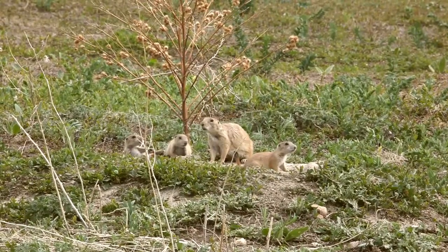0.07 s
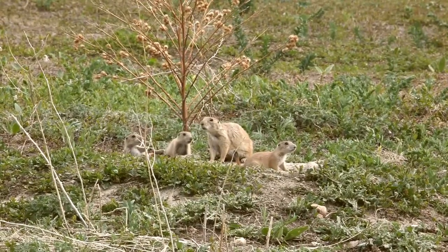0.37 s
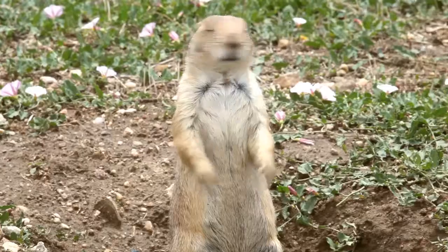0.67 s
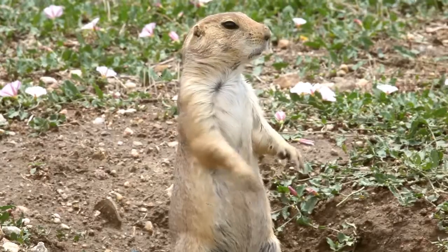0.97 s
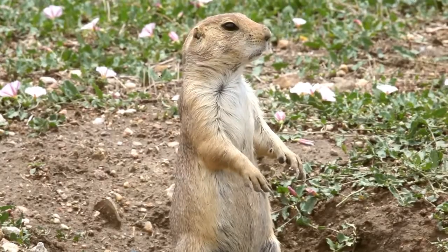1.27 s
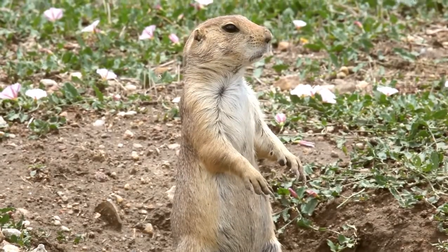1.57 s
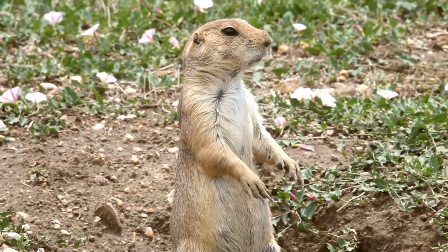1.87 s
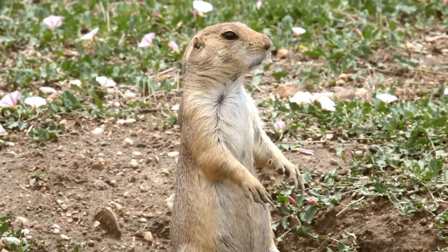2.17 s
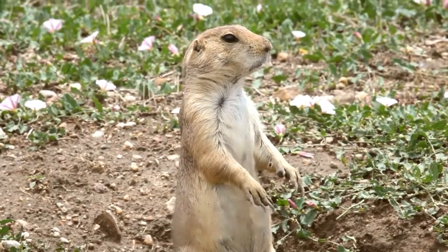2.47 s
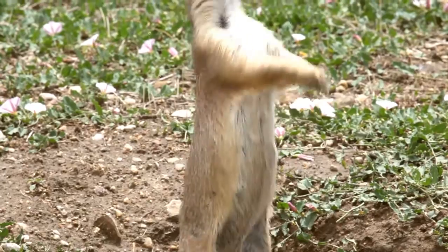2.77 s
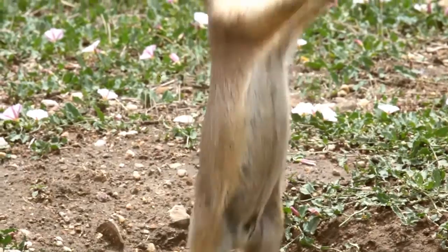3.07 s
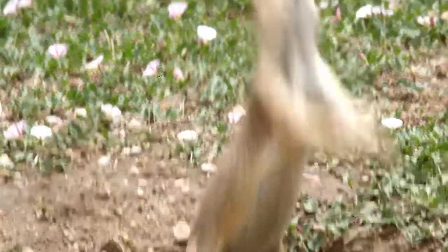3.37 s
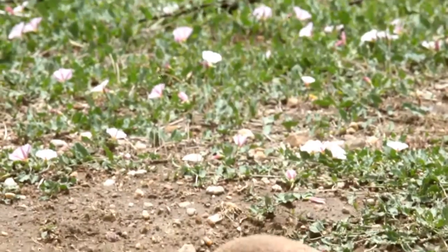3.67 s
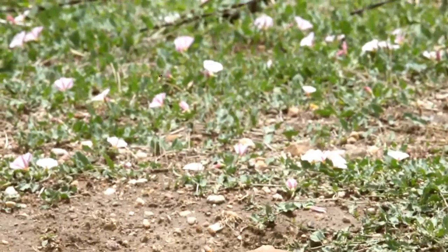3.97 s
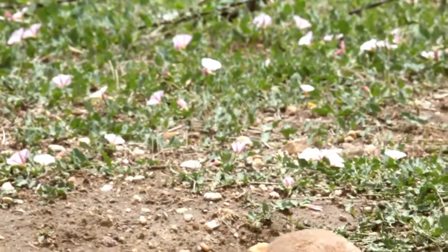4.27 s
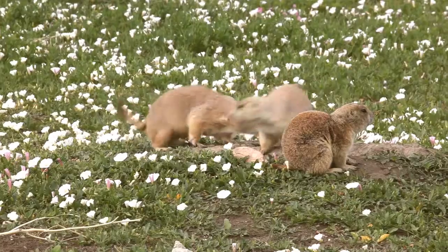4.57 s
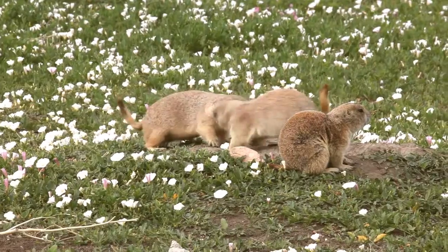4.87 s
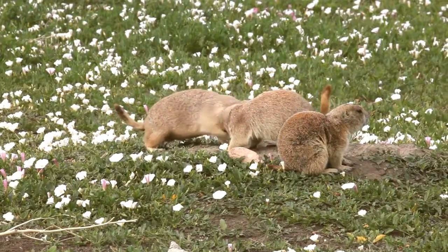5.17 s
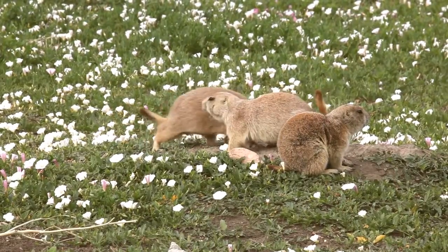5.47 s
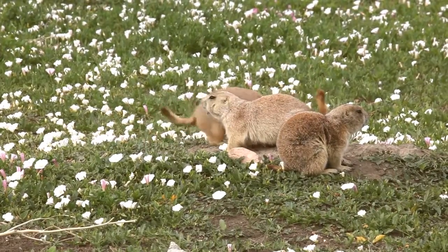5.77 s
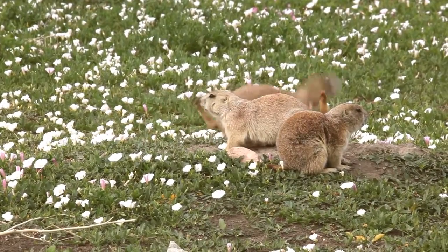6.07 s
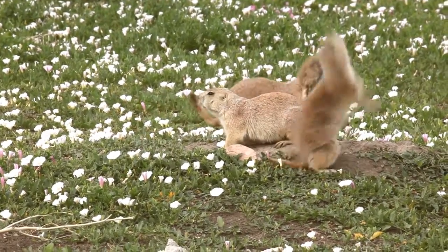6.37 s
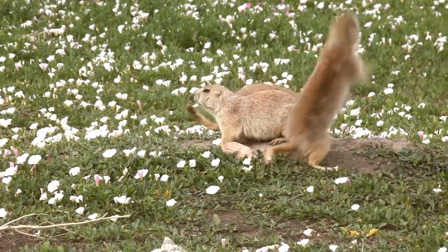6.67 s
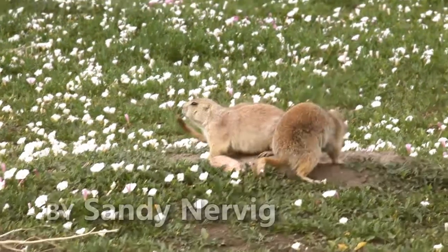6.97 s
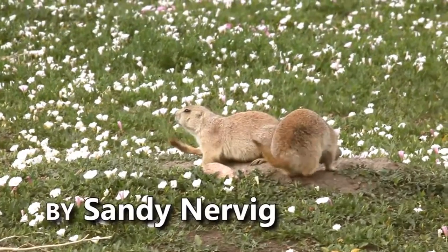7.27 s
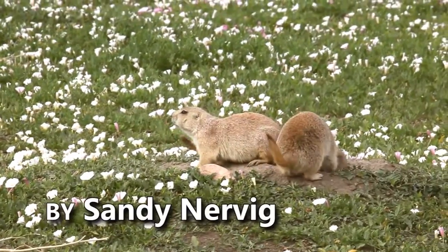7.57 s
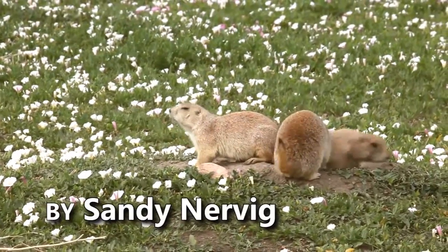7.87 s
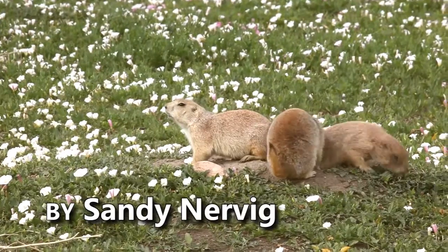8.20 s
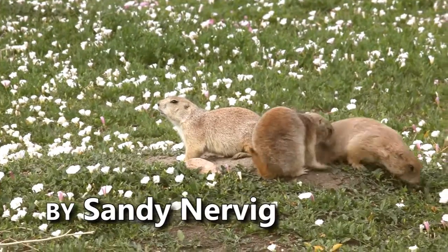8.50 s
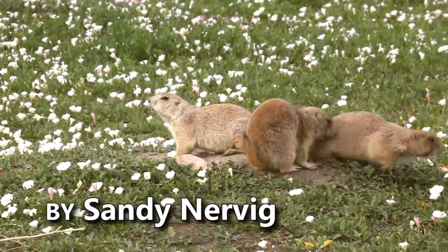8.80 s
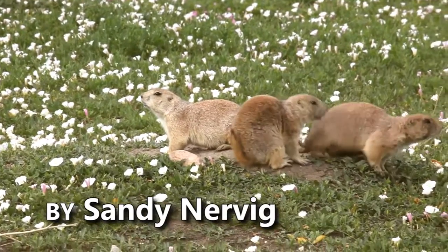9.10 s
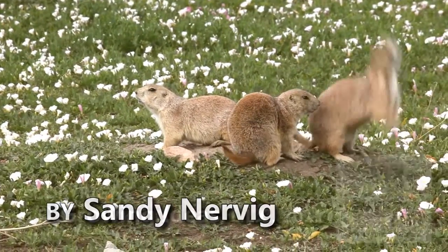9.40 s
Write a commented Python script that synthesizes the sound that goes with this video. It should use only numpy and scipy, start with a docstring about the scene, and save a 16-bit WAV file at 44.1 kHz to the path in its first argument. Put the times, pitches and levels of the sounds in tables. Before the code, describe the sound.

Separate bursts of sharp prairie dog yips and gliding squeals in quiet grassland, with faint insect ticks and a light breeze.

```python
"""A grassland prairie dog colony, heard from three spots in turn; the middle one is close to the animals.
Each yip is a high gliding voice from the vocal folds that breaks into a rasp, shaped by throat and mouth.
Soft squeaks fall between the yips, small birds chirp far off and insects tick in the grass.
A far engine drones and grass rustles at the close spot; at the other two, light wind bumps the microphone."""
import sys
import numpy as np
from scipy import signal
from scipy.fft import rfft, irfft, next_fast_len
from scipy.io import wavfile
from scipy.ndimage import uniform_filter1d, minimum_filter1d

SR = 44100
rng = np.random.default_rng(int(sys.argv[2]) if len(sys.argv) > 2 else 0)


def wav_record(signal):
    """Record a signal, one row per channel, as 16-bit PCM in the file named by sys.argv[1]."""
    frames = np.transpose(np.atleast_2d(signal))
    bounded = np.clip(frames, -1, 1)
    # unit amplitude maps onto the largest positive 16-bit level
    quanta = np.round(bounded * 32767).astype(np.int16)
    wavfile.write(sys.argv[1], SR, quanta)


N = 420713
CLOSE_START_S, CLOSE_END_S = .68, 4.487   # time spent at the close spot
CUTOFF_HZ = 11900   # top of the treble
# throat shapes for the soft squeaks: (frequency [Hz], gain [dB])
SQUEAK_THROAT = [(600, -35), (1800, -5), (3000, 0.5), (3800, -1), (5800, -6.5), (8500, -18), (12000, -39)]
WHINE_THROAT = [(600, -22), (1800, -11.5), (3000, -4), (3800, -1.5), (5800, 3.5), (8500, -18), (12000, -47)]
PEEP_THROAT = [(600, -30), (1800, -15), (3000, 1), (3800, 4), (5800, -6.5), (8500, -16), (12000, -63)]
SOFT_THROAT = [(600, -6), (1800, 2), (3000, 9.5), (3800, -9), (5800, -10), (8500, -42), (12000, -39)]


def prairie_dogs():
    """Nine calls, each with its own tune and rasp; the two "oo" calls share a throat shape."""
    # the path of each call: (time [s], pitch [Hz], level [dB])
    raspy_yip = [(0.786, 1687, -32), (0.802, 2032, -19), (0.832, 2262, -16), (0.898, 2115, -18),
                 (0.93, 1940, -20), (1.004, 1784, -30), (1.04, 1518, -35.5), (1.054, 1410, -45.5)]
    sharp_yip = [(1.878, 1763, -22), (1.888, 2076, -6), (1.904, 2150, -8.5), (1.922, 2010, -6),
                 (1.93, 1896, -9.5), (1.976, 1879, -10.5), (1.984, 1770, -19.5), (2.0, 1280, -31.5)]
    close_whee = [(2.922, 1339, -8), (2.944, 1791, -7.5), (2.982, 2063, -10), (3.004, 2399, -8.5),
                  (3.03, 2624, -8.5), (3.05, 2542, -9.5), (3.06, 2046, -16.5), (3.09, 1810, -19.5),
                  (3.132, 1719, -21.5), (3.252, 1307, -26.5), (3.275, 1263, -33)]
    close_oo = [(3.298, 1179, -41), (3.32, 1124, -30), (3.356, 1178, -30), (3.376, 1422, -29.5),
                (3.432, 1236, -27), (3.47, 1120, -36), (3.49, 995.2, -37)]
    low_oo = [(3.492, 972, -34), (3.518, 869, -32), (3.624, 670, -46.5), (3.66, 590, -57)]
    arched_yip = [(5.988, 1003, -33), (6.046, 1225, -26.5), (6.102, 1179, -23.5), (6.122, 929.6, -37),
                  (6.148, 783, -38), (6.168, 740, -42), (6.26, 722.5, -50)]
    clear_whee = [(6.287, 1055, -34), (6.297, 1030, -25), (6.325, 1120, -18), (6.367, 1016, -24.5),
                  (6.439, 1024, -26), (6.473, 1194, -19.5), (6.505, 1244, -18.5), (6.531, 1214, -19),
                  (6.549, 924, -37.5), (6.555, 915, -33)]
    rising_yip = [(9.047, 1065, -37), (9.067, 1116, -25.5), (9.175, 1276, -23.5), (9.231, 1296, -21.5),
                  (9.247, 1120, -27.5), (9.255, 1080, -37)]
    last_whee = [(9.338, 779, -34), (9.37, 989.9, -21.5), (9.402, 1112, -23.5), (9.438, 1160, -17),
                 (9.458, 1113, -18), (9.476, 1150, -15.5), (9.494, 1089, -18.5), (9.54, 1177, -12.5)]
    # how throat and mouth boost or weaken each frequency: (frequency [Hz], gain [dB])
    raspy_throat = [(600, -36), (1200, -29), (1800, -33), (2400, -8), (3000, -3.5), (3800, 1), (4700, -6),
                    (5800, 0), (7000, -9), (8500, -21), (10000, -25), (12000, -59)]
    sharp_throat = [(600, -63.5), (1200, -39), (1800, -36), (2400, -19), (3000, -25.5), (3800, -19.5),
                    (4700, -23.5), (5800, 4), (7000, -10.5), (8500, -9), (10000, -29), (12000, -24)]
    whee_throat = [(600, -105), (1200, -11), (1800, -7.5), (2400, 4.5), (3000, 9), (3800, -2.5), (4700, 1),
                   (5800, 2.5), (7000, -17), (8500, -10.5), (10000, -35), (12000, -25)]
    oo_throat = [(600, -17), (800, -3), (1000, -20), (1250, 0.5), (1800, -5.5), (2500, 8), (3000, 5),
                 (3800, -8.5), (4700, -2), (5800, -4), (7000, -18), (12000, -33)]
    arched_throat = [(600, -12.5), (1200, -24.5), (1800, -8.5), (2400, -1), (3000, -0.5), (3800, 0),
                     (4700, -2), (5800, -9), (7000, -20), (8500, -11.5), (10000, -22), (12000, -29)]
    clear_throat = [(600, -32), (1200, -24), (1800, -23), (2400, 3.5), (3000, 3), (3800, -2), (4700, -2.5),
                    (5800, 7), (7000, -8), (8500, -12), (10000, -29), (12000, -39)]
    rising_throat = [(600, -59), (1200, -23.5), (1800, -19), (2400, -17), (3000, -10.5), (3800, -1),
                     (4700, -8), (5800, -6), (7000, 0), (8500, -12), (10000, -26), (12000, -46)]
    last_throat = [(600, -44), (1200, -31.5), (1850, -34), (2300, 0), (2700, -5.5), (3100, -12),
                   (3700, -8.5), (4500, -17.5), (5400, -19.5), (7000, -37), (8500, -36.5), (12000, -53)]
    raspy = call_shape(raspy_yip, calm=0.54, rasp=0.93, rasp_at_s=0.065, build_s=.03, clear_s=0.035,
                       mouth_db=3, onset_db=7, closing_s=.08, opening=1.05)
    sharp = call_shape(sharp_yip, calm=0.35, rasp=0.67, rasp_at_s=0.04, build_s=.025, clear_s=0.033,
                       mouth_db=-16.5, onset_db=15.5, closing_s=0.05, opening=1.0)
    whee = call_shape(close_whee, calm=.1, rasp=0.9, rasp_at_s=0.065, build_s=0.049, clear_s=0.28,
                      mouth_db=7, onset_db=-10.5, closing_s=0.015, opening=0.57, attack_db=6)
    oo = call_shape(close_oo, calm=.6, rasp=1.0, rasp_at_s=0.049, build_s=0.036, clear_s=0.046,
                    mouth_db=1)
    low = call_shape(low_oo, calm=0.28, rasp=0.61, rasp_at_s=0.027, build_s=.06, clear_s=0.045,
                     mouth_db=-0.5, onset_db=11, closing_s=0.033)
    arched = call_shape(arched_yip, calm=.3, rasp=.72, rasp_at_s=.105, build_s=.045, clear_s=.04,
                        mouth_db=-7.5, onset_db=5, closing_s=0.014, opening=-0.18)
    clear = call_shape(clear_whee, calm=.09, rasp=0.74, rasp_at_s=0.26, build_s=0.032, clear_s=.04,
                       mouth_db=3, onset_db=18.5, closing_s=0.054, opening=0.9, catch=0.75)
    rising = call_shape(rising_yip, calm=0.24, rasp=0.77, rasp_at_s=0.15, build_s=0.085, clear_s=0.041,
                        mouth_db=-9, onset_db=12, closing_s=0.097, opening=1.0)
    last = call_shape(last_whee, calm=0.45, rasp=0.93, rasp_at_s=0.1, build_s=0.038, clear_s=0.15,
                      mouth_db=0, onset_db=47, closing_s=.035)
    return (voice(raspy, raspy_throat, hiss=1.55, fray_hz=3900)
            + voice(sharp, sharp_throat, hiss=0.56, fray_hz=5500)
            + voice(whee, whee_throat, growl=0.087, hiss=0.83, fray_hz=3500)
            + voice(oo, oo_throat, growl=0.1, hiss=.48, fray_hz=3080)
            + voice(low, oo_throat, growl=.1, hiss=.45, fray_hz=3200, flutter_db=3.5)
            + voice(arched, arched_throat, hiss=0.35, fray_hz=3600)
            + voice(clear, clear_throat, hiss=.6, jitter=0.0025, fray_hz=5200)
            + voice(rising, rising_throat, growl=.072, hiss=0.94, fray_hz=3900)
            + voice(last, last_throat, growl=.42, hiss=1.0, fray_hz=4200, upper_hz=4880))


def call_shape(curve, calm, rasp, rasp_at_s, build_s, clear_s, mouth_db, onset_db=0, closing_s=0.043,
               opening=0, catch=0, catch_s=0.02, attack_db=0, attack_s=0.003):
    """Curves that steer one call: it turns raspy and clears, while the mouth changes its brightness."""
    t = np.arange(int(curve[0][0] * SR), min(int(curve[-1][0] * SR), N)) / SR
    age = t - t[0]
    pitch, level_db = in_time(curve, t)
    rough = calm + (rasp - calm) * hump(age, rasp_at_s, build_s, clear_s)
    rough += catch * np.exp(-age / catch_s)   # the folds settle after a rough start
    bright_db = mouth_db + onset_db * np.exp(-age / closing_s)
    bright_db += opening * (level_db - level_db.max())   # the mouth follows the effort
    return t, pitch, level_db - attack_db * np.exp(-age / attack_s), rough, bright_db


def voice(shape, throat, hiss, fray_hz, growl=0.018, jitter=0.0044, upper_hz=4500, flutter_db=0):
    """Vocal folds make harmonics (multiples of the pitch); roughness frays them, high ones first."""
    t, pitch, level_db, rough, bright_db = shape
    size = len(t)
    rough = np.clip(rough, 0, 1)
    pitch = uniform_filter1d(pitch, size=300) * (1 + (jitter + .012 * rough) * drift(219, size))
    phase = 2 * np.pi * np.cumsum(pitch) / SR
    folds = np.zeros(size)
    for k in range(1, 17):
        frayed = np.tanh((rough * k * pitch / fray_hz) ** 1.5)
        # uneven cycles smear each harmonic into a band of noise
        uneven = .6 * (drift(900, size) + 1j * drift(900, size))
        wobble = from_db((5 * rough + flutter_db) * drift(45, size))
        pure = np.exp(1j * (k * phase + rng.uniform(0, 2 * np.pi)))
        harmonic = (np.sqrt(1 - frayed ** 2) + frayed * uneven) * pure
        # strong and weak cycles take turns, adding tones between the harmonics
        between = growl * np.sin((k - .5) * phase) * (1 + drift(59, size) / 2)
        folds += (harmonic.real * wobble + between) * (k * pitch < CUTOFF_HZ)
    folds *= 2 * np.sqrt(pitch / SR)   # the same power per Hz as white noise
    breath = hiss * rough ** 2 * rng.standard_normal(size) * (1 + np.cos(phase) / 2)
    sound = coloured(folds + breath, throat)
    # the mouth opening sets how much treble gets out
    lower = signal.sosfiltfilt(signal.butter(4, upper_hz, fs=SR, output="sos"), sound)
    sound = lower + from_db(bright_db) * (sound - lower)
    sound /= np.sqrt(uniform_filter1d(sound ** 2, size=600) + 1e-18)   # even out the loudness
    out = np.zeros(N)
    add(out, t[0], sound * from_db(level_db) * gate(t, t[0], t[-1], 0.0015))
    return out


def squeaks(swell_db=9, bend=1.2):
    """Soft prairie dog notes, each swelling and fading as it glides through three pitches."""
    # squeaks: (time [s], rise [s], fall [s], start pitch [Hz], pitch at peak [Hz], end pitch [Hz],
    # level [dB], roughness [0-1], brightness [dB], throat shape)
    notes = [(1.185, .048, .012, 2410, 2950, 2850, -35.5, 0.67, -1, SQUEAK_THROAT),
             (1.239, 0.017, .07, 2910, 2920, 2540, -41.5, 0.7, 10, SQUEAK_THROAT),
             (1.995, 0.029, 0.07, 1953, 1934, 1900, -36.5, 0.4, 7, PEEP_THROAT),
             (2.059, 0.046, 0.015, 2500, 2810, 2800, -32, 0.53, 12, SQUEAK_THROAT),
             (2.117, 0.011, 0.027, 3370, 3340, 3240, -36, 0.5, -8, SQUEAK_THROAT),
             (2.154, 0.0336, 0.02, 2064, 2220, 2150, -30.5, 0.55, 4, WHINE_THROAT),
             (2.204, 0.009, 0.16, 1910, 1860, 1510, -42.5, 0.65, -9, WHINE_THROAT),
             (4.488, 0.023, 0.033, 1796, 2040, 1700, -35.5, .2, 6, PEEP_THROAT),
             (6.59, 0.073, 0.041, 797, 824, 890, -40, 0.7, 15, SOFT_THROAT),
             (6.69, 0.051, .11, 967, 1006, 780, -41, 0.7, 9, SOFT_THROAT),
             (6.85, 0.073, 0.18, 1110, 1076, 694, -49.5, 0.65, 16, SOFT_THROAT),
             (7.745, .024, 0.04, 1775, 1982, 1630, -33.5, 0.34, -1.5, PEEP_THROAT)]
    out = np.zeros(N)
    for s, rise_s, fall_s, start_hz, peak_hz, end_hz, db, rough, bright_db, throat in notes:
        age = np.arange(int((rise_s + fall_s) * SR)) / SR
        sag = np.interp(age, [0, rise_s, rise_s + fall_s], [1, 0, 1]) ** bend
        pitch = peak_hz + sag * (np.where(age < rise_s, start_hz, end_hz) - peak_hz)
        shape = s + age, pitch, db - swell_db * sag, rough, bright_db
        out += voice(shape, throat, hiss=0.91, fray_hz=4000, flutter_db=2)
    return out


def field_echo(x, echo_db=-32, fade_s=0.75):
    """Mounds and plants scatter a little of the sound back."""
    t = np.arange(int(.6 * SR)) / SR
    echoes = rng.standard_normal(len(t)) * from_db(-60 * t / fade_s) * (t > .012)
    return from_db(echo_db) * signal.fftconvolve(x, echoes / np.linalg.norm(echoes))[:N]


def birds(pip_s=0.017):
    """Far birds whistle single chirps, and short pips in threes."""
    # chirps: (time [s], length [s], start pitch [Hz], middle pitch [Hz], end pitch [Hz], level [dB])
    chirps = [(0.023, 0.056, 4400, 3500, 2850, -51), (0.24, 0.053, 4640, 4060, 4770, -51),
              (0.555, 0.074, 3740, 4130, 3700, -50), (0.589, 0.052, 4000, 3570, 3600, -46.5),
              (7.043, 0.085, 4140, 4120, 4200, -42), (7.126, 0.22, 4300, 4030, 3900, -44.5),
              (7.277, 0.34, 3780, 3730, 3510, -49.5), (7.975, 0.038, 4900, 4800, 4880, -48)]
    # groups of pips: (time [s], spacing [s], pitch [Hz], level [dB])
    pips = [(.3, .034, 6100, -52), (.395, 0.039, 5030, -53), (.555, 0.032, 6070, -50.5),
            (5.14, .068, 5200, -54), (8.125, 0.047, 5200, -59), (8.515, 0.047, 5200, -55)]
    out = np.zeros(N)
    for s, length, start_hz, middle_hz, end_hz, db in chirps:
        add(out, s, from_db(db) * whistle(length, start_hz, middle_hz, end_hz))
    for s, spacing, hz, db in pips:
        for k in range(3):
            add(out, s + k * spacing, from_db(db) * whistle(pip_s, hz * 1.02, hz, hz * 1.03))
    return out


def whistle(length, start_hz, middle_hz, end_hz, waver=.01, flutter_db=3.5):
    """A nearly pure note bends through three pitches and flutters on its way through the air."""
    size = int(length * SR)
    progress = np.linspace(0, 1, size)
    bend = np.polyfit([0, .5, 1], [start_hz, middle_hz, end_hz], 2)
    hz = np.polyval(bend, progress) * (1 + waver * drift(160, size))
    swell = np.sqrt(2 * np.abs(np.sin(np.pi * progress)))
    flutter = from_db(flutter_db * drift(35.2, size))
    return np.sin(2 * np.pi * np.cumsum(hz) / SR) * swell * flutter


def insect_ticks(boost_db=17, crackle=0.13, crackle_s=0.0023):
    """Each dry tick is a snap and a short crackle that ring briefly, with a lower knock."""
    # ticks: (time [s], relative level [dB], gain of its knock [dB])
    ticks = [(1.3318, -18, -19), (1.6307, -11.5, -15), (1.633, -12.5, -10), (1.6693, -23, -15),
             (1.872, -12, -27), (2.06, -21, -14), (2.4163, -16.5, -18), (2.8314, -11, -32),
             (2.8676, -16, -11.5), (3.254, -32, -30), (3.811, -20, -28), (3.931, -24, -21),
             (4.0507, -18, -31), (4.157, -21, -24), (4.3105, -15.5, -32), (4.4291, -16, -23)]
    # bands in which a tick rings: (frequency [Hz], width [Hz], gain [dB])
    bands = [(3300, 800, -8.5), (5600, 1400, -4), (6740, 1150, 0.5), (8420, 4400, -13.5)]
    out, t = np.zeros(N), np.arange(900) / SR
    for s, db, knock_db in ticks:
        snap = (t == 0) + crackle * rng.standard_normal(len(t)) * np.exp(-t / crackle_s)
        ring = sum((-1) ** k * from_db(band_db) * resonance(snap, hz, width)
                   for k, (hz, width, band_db) in enumerate(bands))
        knock = from_db(knock_db) * resonance(snap, hz=1500, width_hz=1700)
        add(out, s, from_db(db + boost_db) * (ring + knock))
    return out


def engine(t, trim_db=-2, flutter=0.44):
    """A far engine fires in a deep hum over a rumble; its overtones flutter in the moving air."""
    # loudness of its parts: (time [s], hum [dB], rumble before trim [dB], overtones before trim [dB])
    levels = [(0.68, -57, -64, -70), (0.94, -50.5, -64, -81), (1.77, -52, -64.5, -76),
              (2.8, -46, -48.5, -52.5), (3.25, -46, -53, -59), (4.48, -41.5, -43, -58.5)]
    # engine speed: (time [s], firing rate [Hz])
    firing = [(.68, 89.3), (2.4, 88.4), (3.6, 91.2), (4.48, 93)]
    # overtones: (multiple of the firing rate, gain [dB])
    multiples = [(2, 1), (3, -8.5), (4, 0.5), (5, -18.5)]
    # tone of the rumble: (frequency [Hz], gain [dB])
    rumble_colour = [(65, -15.5), (110, -5), (124, -18.5), (211, -5), (264, -13.5), (456, -11.5),
                     (739, -26.5), (1310, -21), (1600, -26.5), (2080, -57.5), (3520, -120)]
    hum_db, rumble_db, overtone_db = in_time(levels, t)
    phase = 2 * np.pi * np.cumsum(in_time(firing, t)[0]) / SR
    overtones = sum(from_db(db) * np.sin(k * phase) * (1 + flutter * drift(3.9, N))
                    for k, db in multiples)
    hum = from_db(hum_db) * np.sin(phase) + from_db(overtone_db + trim_db) * overtones
    return np.sqrt(2) * hum + from_db(rumble_db + trim_db) * noise(rumble_colour)


def wind(t, breeze_db=-63, lumpy_db=3):
    """Gusts swirl around the microphone; a light breeze joins them at the last spot."""
    # gusts: (time of peak [s], length [s], level [dB])
    gusts = [(.27, 0.13, -59), (4.6, 0.18, -60.5), (5.3, .22, -60), (6.905, 0.85, -62), (7.53, .15, -45),
             (8.03, 0.5, -54), (8.348, .06, -51)]
    # tone of wind on the microphone: (frequency [Hz], gain [dB])
    colour = [(15, -36), (30, -9), (60, 1.5), (130, 0.5), (230, -5.5), (350, -16.5), (600, -44),
              (1200, -93)]
    strength = from_db(breeze_db) * (t > CLOSE_END_S)
    for s, length, db in gusts:
        strength += from_db(db) * hump(t, s, length / 2, length / 2)
    return strength * from_db(lumpy_db * drift(27, N)) * noise(colour)


def wind_puffs(boost_db=38, thump_hz=130, width_hz=130):
    """Single swirls of air thump on the microphone."""
    # puffs: (time [s], relative level [dB])
    puffs = [(0.264, -40), (4.62, -34), (4.76, -29.5), (4.772, -36), (7.502, -35), (8.058, -35)]
    kicks = np.zeros(N)
    for s, db in puffs:
        add(kicks, s, from_db([db + boost_db]))
    return resonance(resonance(kicks, thump_hz, width_hz), thump_hz, 2 * width_hz)


def grass_rustle(t, final_db=-49.5, growth_db_per_s=5.5, brush_db=6):
    """Grass stirs more and more at the close spot, with one louder brush."""
    # tone of the rustle: (frequency [Hz], gain [dB])
    colour = [(2000, -21), (3200, -2), (3900, 4), (5000, -11), (7000, -4), (9000, -15), (12000, -41)]
    db = final_db + growth_db_per_s * np.minimum(t - CLOSE_END_S, 0)
    db += brush_db * hump(t, top_s=4.19, rise_s=.035, fall_s=.035)
    return from_db(db) * noise(colour)


def background(t, wide_db=-49.5, close_db=-49.5, meadow_db=-48, dip_db=-8):
    """Air and grass hiss at each spot, with engine and rustle at the close one; the level dips once."""
    # tone of the air and grass at the three spots: (frequency [Hz], gain [dB])
    wide_air = [(24, -31), (40, 3), (86, 1.5), (274, -10), (401, 0), (533, -11), (644, -1.5), (726, -8),
                (1140, -2.5), (2110, -7.5), (5090, -4), (11700, -11), (15200, -42), (22000, -120)]
    close_air = [(76, -36.5), (130, -6.5), (189, -0.5), (247, -11), (287, -7.5), (366, -8.5), (410, -19.5),
                 (956, -6.5), (1960, -11), (2320, -10.5), (3010, -11), (3710, -8.5), (11700, -19),
                 (15200, -51), (22000, -120)]
    meadow_air = [(24, -39), (40, -22), (141, -2.5), (261, 0.5), (339, -12), (391, -5), (485, -10),
                  (586, -8.5), (837, -14), (1590, -2.5), (2440, -11.5), (3170, -11), (4110, -12),
                  (7620, -14.5), (11700, -20), (15200, -57), (22000, -120)]
    wide = from_db(wide_db) * noise(wide_air)
    close = from_db(close_db) * noise(close_air) + engine(t) + grass_rustle(t)
    meadow = from_db(meadow_db) * noise(meadow_air)
    is_close = gate(t, CLOSE_START_S, CLOSE_END_S, 0.005)
    dip = from_db(dip_db * hump(t, top_s=3.065, rise_s=.06, fall_s=0.27))
    return dip * (is_close * close + (1 - is_close) * np.where(t < 2, wide, meadow))


def from_db(db):
    """Turn decibels into a gain."""
    return 10 ** (np.asarray(db) / 20)


def in_time(rows, t):
    """Read a table's columns at the times t, joining its rows with straight lines."""
    s, *columns = np.transpose(rows)
    return [np.interp(t, s, column) for column in columns]


def coloured(x, colour):
    """Filter x by a table of (frequency [Hz], gain [dB])."""
    size = next_fast_len(len(x) + 512)
    hz, db = np.transpose(colour)
    bins = np.maximum(np.fft.rfftfreq(size, 1 / SR), 1)
    gain = from_db(np.interp(np.log(bins), np.log(hz), db))
    return irfft(rfft(x, size) * gain, size)[:len(x)]


def noise(colour):
    """Filtered noise with an average power of 1."""
    x = coloured(rng.standard_normal(N), colour)
    return x / np.sqrt(np.mean(x ** 2) + 1e-20)


def drift(rate_hz, size):
    """A smooth random wander around zero."""
    steps = np.arange(size) * rate_hz * 2 / SR
    return np.interp(steps, np.arange(size), rng.standard_normal(size))


def gate(t, start, end, edge_s):
    """One between start and end, with short fades."""
    return np.clip(np.minimum(t - start, end - t) / edge_s, 0, 1)


def hump(t, top_s, rise_s, fall_s):
    """A smooth swell to one and back."""
    return np.exp(-((t - top_s) / np.where(t < top_s, rise_s, fall_s)) ** 2)


def resonance(x, hz, width_hz):
    """Make x ring around one frequency; a narrower band rings longer."""
    r = np.exp(-np.pi * width_hz / SR)
    feedback = [1, -2 * r * np.cos(2 * np.pi * hz / SR), r * r]
    return signal.lfilter(np.array([1, 0, -1]) * (1 - r * r) / 2, feedback, x + 1e-18)


def add(out, s, x):
    """Mix x into out at time s."""
    i = max(int(s * SR), 0)
    out[i:i + len(x)] += x[:max(len(out) - i, 0)]


def scene():
    """Calls and small sounds over the background, the same in both channels."""
    t = np.arange(N) / SR
    calls = squeaks() + prairie_dogs()
    mono = calls + field_echo(calls) + birds() + insect_ticks() + background(t) + wind(t) + wind_puffs()
    return np.array([mono, mono])


def record(dry):
    """A fast limiter turns down the loudest peaks, what gets past it clips, and the top treble is cut."""
    allowed = np.minimum(1, 1.15 / (np.abs(dry).max(axis=0) + 1e-9))
    gain = uniform_filter1d(minimum_filter1d(allowed, size=120), size=120)
    clipped = np.clip(dry * gain, -1, 1)
    return signal.sosfilt(signal.ellip(12, .1, 85, CUTOFF_HZ, fs=SR, output="sos"), clipped)


dry = scene()
out = record(dry)
wav_record(out)
```